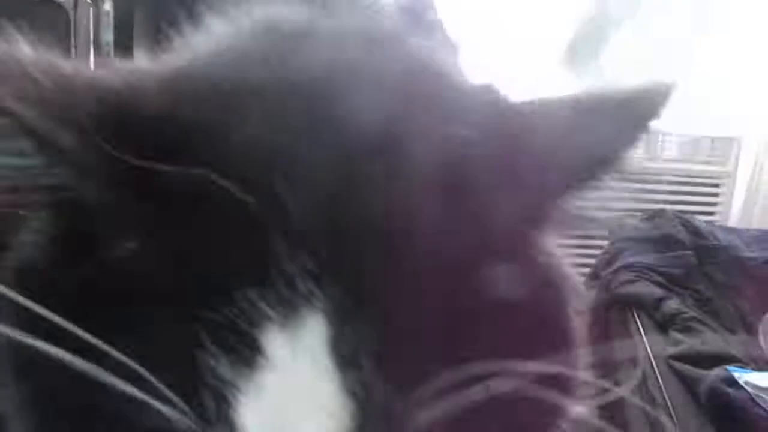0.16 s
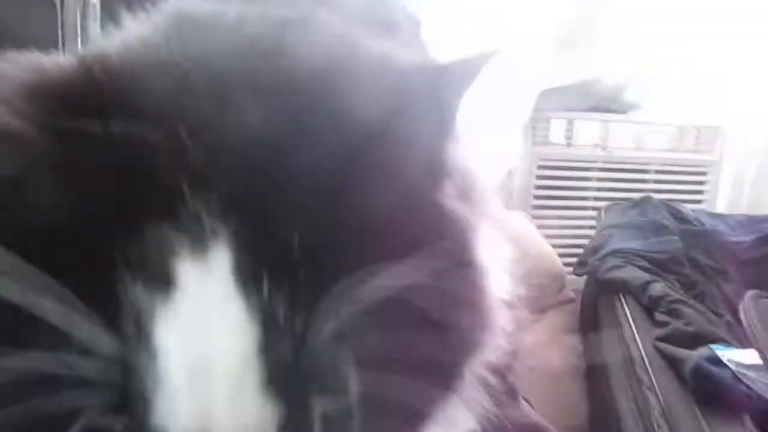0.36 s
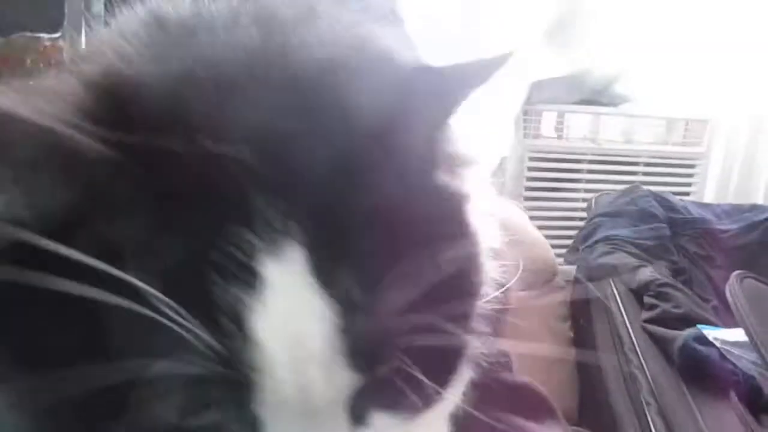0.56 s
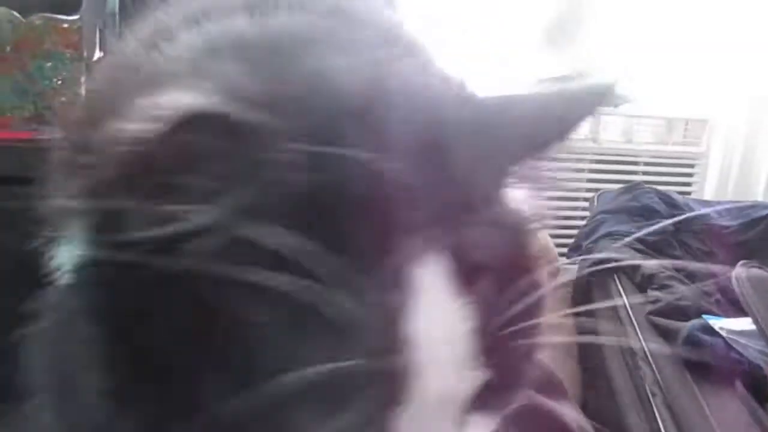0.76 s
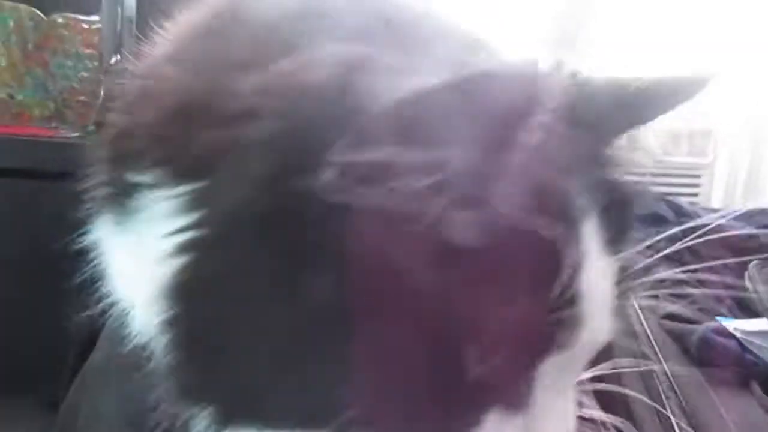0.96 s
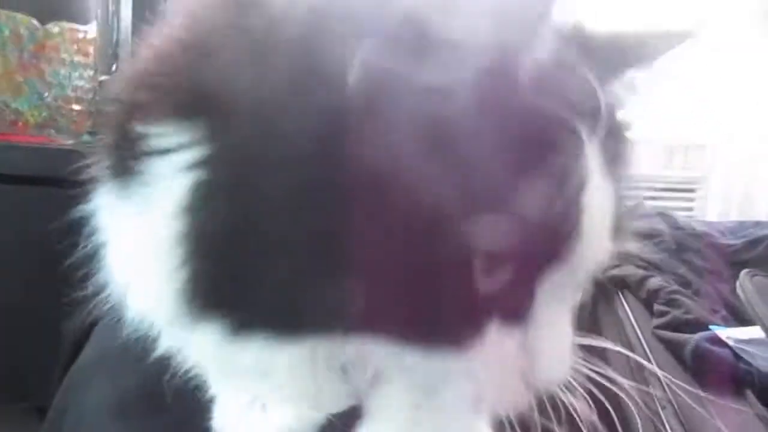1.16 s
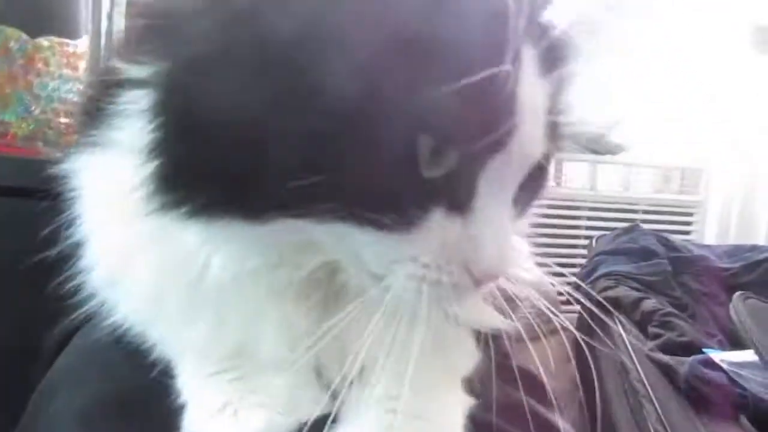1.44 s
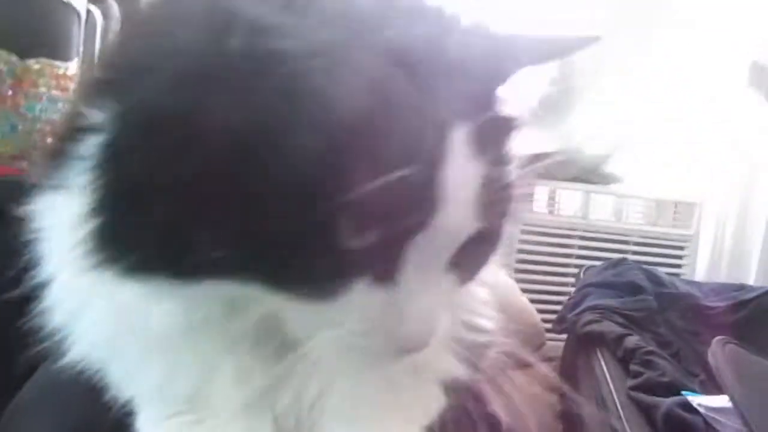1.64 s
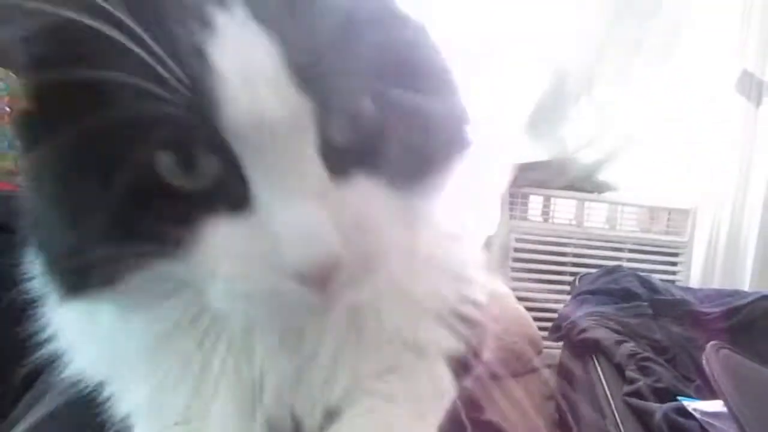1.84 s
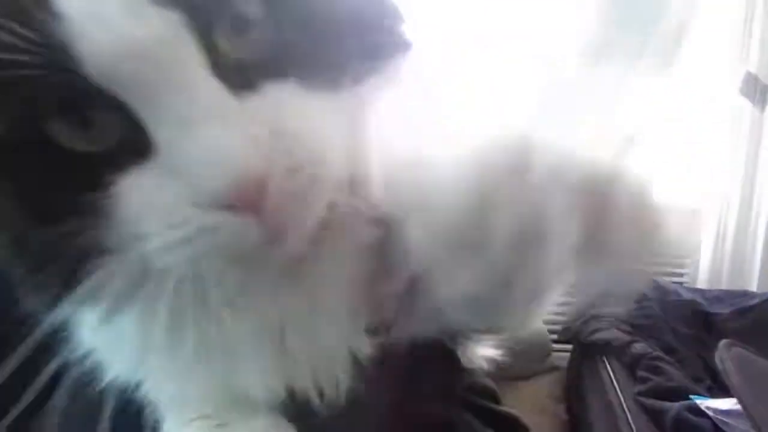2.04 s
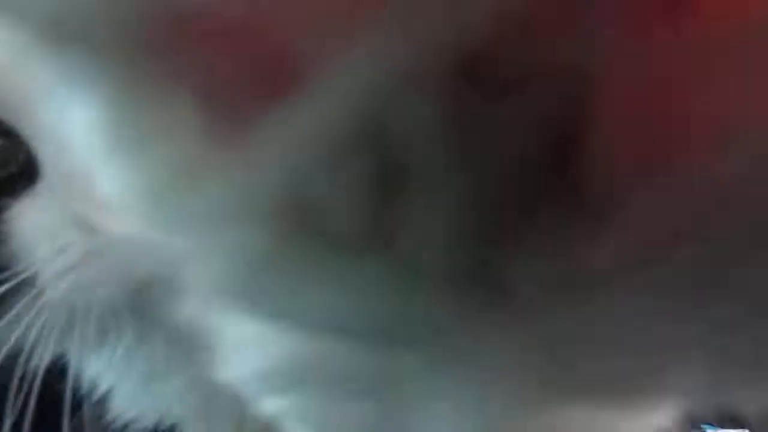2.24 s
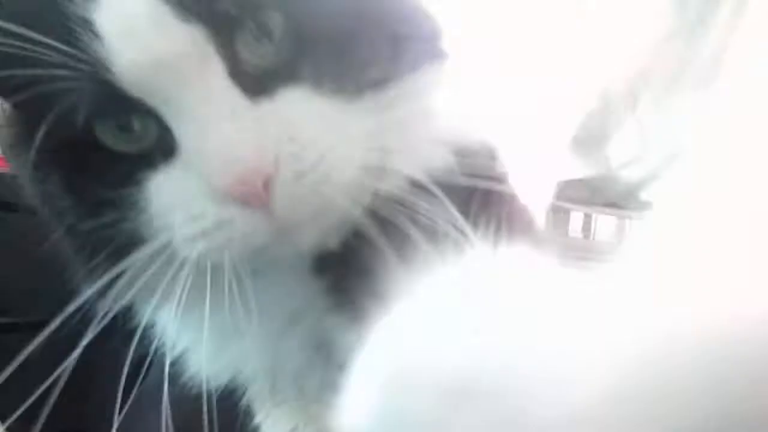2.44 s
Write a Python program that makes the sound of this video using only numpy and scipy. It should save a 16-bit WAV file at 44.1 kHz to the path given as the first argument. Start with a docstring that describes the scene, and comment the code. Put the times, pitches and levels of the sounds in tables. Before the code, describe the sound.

A cat bumps a microphone indoors: clustered dull pops and rubs first, a quieter gap with faint regular ticking, then more thumps and a flickering paw swipe; low room rumble and fuzzy hum stay underneath.

```python
"""Over a quiet room's rumble, fuzzy hum and thin whine, a cat bumps and rubs its face on a camera from 0.2 s.
The harder pushes overload the microphone, whose bass cut turns the flattened swings into dull pops; the softer
ones stay below its limit. Whiskers and claws tick on the case throughout: short noise snaps with a ring.
From 0.9 s a faint gliding tone calls, probably a mew; from 1.4 to 2.1 s tiny falling chirps and soft thuds
tick regularly. At 2.3 s a paw brushes past as flickering, resonant noise, between the last bumps and rubs."""
import sys
import numpy as np
from scipy import signal
from scipy.fft import rfft, irfft
from scipy.io import wavfile

SR = 44100
rng = np.random.default_rng(int(sys.argv[2]) if len(sys.argv) > 2 else 0)


def wrap_up_sound(samples):
    """Save the sound to the file named by the first command line argument, as 16-bit audio."""
    columns = np.atleast_2d(samples).T
    # keep every value between -1 and 1, then stretch to whole-number steps
    tamed = np.clip(columns, -1, 1)
    steps = np.round(tamed * 32767).astype(np.int16)
    wavfile.write(sys.argv[1], SR, steps)


N = 114660  # 2.6 s

# Nose and paw bumps: (time [s], width [ms], peak pressure [dB over the overload point])
BUMPS = [(0.2077, 4.4, -6), (0.2316, 2.72, 1), (0.2483, 2.23, 6.5), (0.2571, 1.07, 9), (.4818, 3.85, 0.5),
         (0.6093, 2.96, 5.5), (0.6505, 2.325, 14), (0.6786, 3.05, -4.5), (.313, 8.9, -13),
         (0.706, 2.95, -20), (0.776, 4.0, -27.5), (0.8489, 3.97, 5), (1.1622, 2.264, 14.5),
         (1.709, 4.16, -28), (1.93, 2.6, 5.5), (1.939, 2.13, 9), (2.161, 2.52, 8), (2.2962, 2.86, 9),
         (2.418, 7.8, -6.5)]
# Rubs of the face: (start [s], length [s], start pressure [dB over the overload point], end pressure [dB],
# mean judder rate [Hz], grit [dB against judder], sway [dB against judder])
RUBS = [(0.232, 0.019, -9, -6, 170, -1.5, -6.5), (0.244, 0.026, 7.5, 4, 91, -10, -4),
        (0.259, 0.052, -7.5, -10, 150, -6.5, -15.5), (0.6, 0.043, 0.5, -1.5, 55.9, -18, -9),
        (.635, 0.028, 0.5, 5.5, 153.5, -13.5, -4), (0.844, 0.074, 15.5, -0.5, 111.7, -8, -5.5),
        (1.131, 0.043, -13, 4, 85.07, -8.5, -18), (1.158, 0.056, 4, -27, 96.2, -10, -2),
        (1.902, .048, -4, 2.5, 129.5, -6.5, -1), (1.941, 0.0398, -13, -33, 125.5, -3.5, 1),
        (2.151, 0.03, 4, -3, 71.2, -10.5, -8), (2.172, 0.041, -19.5, -30.5, 102, -6.5, 11),
        (2.282, 0.0275, 8, 4.5, 110, -15.5, -12), (2.407, 0.027, -18, -18, 142, -20.5, -28.5)]
# Whisker and claw ticks: (time [s], snap level [dB], ring pitch [Hz], ring share [dB against snap])
TICKS = [(0.1951, -35.5, 2100, -21.5), (.473, -47, 3760, -9.5), (.509, -43.5, 3940, -35.5),
         (1.1293, -34, 3900, -18.5), (1.7018, -38, 3630, -16.5), (2.070, -51.5, 2500, -11),
         (2.2485, -27, 3240, -11), (2.2578, -28, 4800, -14), (2.2685, -26.5, 3520, -8.5),
         (2.329, -35.5, 3910, 9), (2.592, -45.5, 3530, -10)]
# Colour of a tick's snap: (frequency [Hz], relative level [dB per Hz])
TICK_COLOUR = [(60, -7.5), (400, 14.5), (1200, -0.5), (3000, -10), (5500, -22), (11000, -36), (15000, -61)]
# Colour of the fur's grit in the rubs: (frequency [Hz], relative level [dB per Hz])
GRIT_COLOUR = [(30, -5), (150, 10.5), (350, 4.5), (700, -13.5), (1400, -29.5), (3000, -47.5), (8000, -57),
               (16000, -74)]
# Resonant colour of the paw's brush: (frequency [Hz], relative level [dB per Hz])
BRUSH_COLOUR = [(200, 17), (700, 5.5), (1400, -13), (1950, 1), (2500, -21.5), (3400, 2), (3950, 0.5),
                (4700, -0.5), (5600, -19.5), (7400, -15), (8500, -3), (9400, -14), (12500, -26.5),
                (16000, -56.5)]
# Glide of the mew: (time [s], pitch [Hz], level of the fundamental [dB], overtones [dB against it])
MEW = [(.92, 350, -34, -12), (.97, 344.6, -55.5, 5), (1.01, 405, -53.5, 2.5), (1.05, 485, -50.5, -1.5),
       (1.10, 535, -58, -1.5), (1.18, 512.8, -42, -17), (1.24, 513, -51.5, -13.5), (1.29, 492, -48, -14.5),
       (1.345, 463, -52.5, -17), (1.38, 455, -64, -26)]
# Colour of the room's rumble: (frequency [Hz], relative level [dB per Hz])
ROOM_COLOUR = [(25, -2.5), (50, 4), (90, -10), (170, -17.5), (350, -15), (480, -25), (650, -29.5),
               (800, -36), (1200, -27), (1600, -40), (2500, -47.5), (5000, -52.5), (9000, -61),
               (16000, -63.5)]
# Swell of the rumble: (time [s], level [dB])
ROOM_LEVEL = [(0, -47.5), (.4, -45), (.8, -44.5), (1.1, -45), (1.45, -53.5), (1.8, -49.5), (2.05, -46),
              (2.6, -53)]
# Resonances of the hum: (frequency [Hz], width [Hz], level before the swell [dB])
HUM_BANDS = [(297, 14, -69), (377, 23, -66), (640, 240, -70), (1207, 110, -77.5)]
# Swell of the hum: (time [s], gain [dB])
HUM_GAIN = [(0, 5.5), (.2, 10), (.45, 6.5), (.8, 8.5), (1.45, 1.5), (2.6, -3.5)]
# Thin whine: (frequency [Hz], level [dB])
WHINE = [(11822, -106)]

BUMP_SKEW = 0.4  # the release is slower than the push
RUB_EDGE_S = 0.0086
JUDDER_SPREAD, JUDDER_WANDER_HZ = 0.254, 185  # unevenness of the pace (log units), and how fast it wanders
SWAY_HZ, SWAY_SPREAD, SWAY_WANDER_HZ = 54.03, .15, 37.5
OVERLOAD_KNEE = 49  # higher is a harder corner
BASS_CUT_HZ, TREBLE_CUT_HZ, CONTACT_DB = 148.7, 6800, 1.5
TICK_DECAY_S, TICK_RING_WIDTH_HZ = 0.0025, 700
BRUSH_START_S, BRUSH_LENGTH_S, BRUSH_EDGE_S, BRUSH_DB = 2.3, .13, .028, -40.5
BRUSH_FLICKER_DB, BRUSH_FLICKER_HZ = 2.8, 120
MEW_ROLLOFF_DB = -10  # step from each overtone to the next
TICKING_FIRST_S, TICKING_END_S, TICKING_PERIOD_S, TICKING_PAIR_S = 1.3615, 2.15, .08, .0245
CHIRP_DB, CHIRP_TOP_HZ, CHIRP_END_HZ, CHIRP_LENGTH_S = -64, 3900, 1700, .007  # level varies around this
THUD_DB, THUD_HZ, THUD_LENGTH_S = -48, 345, .028  # level and pitch vary around these
DUCK_FROM_DB, DUCK_SHARE, DUCK_SMOOTH_S = -19.5, 0.53, 0.038
HELD_FALL_DB_PER_S = 10.5  # fall of the held level that steers the ducking
TOP_EDGE_HZ = 16470


def amp(db):
    """Decibels to amplitude."""
    return 10 ** (np.asarray(db) / 20)


def evened(x):
    """The sound at unit power."""
    return x / np.sqrt(np.mean(x ** 2) + 1e-20)


def add(mix, start, sound):
    """Lay a sound into the mix at a time in seconds."""
    part = mix[max(round(start * SR), 0):][:len(sound)]
    part += sound[:len(part)]


def curve(points, axis=1):
    """One column of a control table, joined by straight lines in time."""
    columns = np.transpose(points)
    return np.interp(np.arange(N) / SR, columns[0], columns[axis])


def noise(gain):
    """Noise of unit power with the given gain over frequency."""
    spectrum = rfft(rng.standard_normal(N))
    return evened(irfft(spectrum * gain(np.fft.rfftfreq(N, 1 / SR)), N))


def coloured(points):
    """Unit-power noise that follows a colour table, with the lowest bass eased away."""
    hz, db = np.transpose(points)
    return noise(lambda f: amp(np.interp(np.log(f + 1), np.log(hz), db)) * f / (f + 10))


def band(hz, width):
    """Unit-power noise in one resonance."""
    return noise(lambda f: 1 / (1 + ((f - hz) / width * 2) ** 2))


def stroke(start, length, edge):
    """A window with smooth edges, and the progress through it from 0 to 1."""
    t = np.arange(N) / SR - start
    ramp = np.clip(np.minimum(t, length - t) / edge, 0, 1)
    return np.sin(np.pi / 2 * ramp) ** 2, np.clip(t / length, 0, 1)


def uneven_clock(spread, wander_hz):
    """Phase of a 1 Hz cycle whose pace wanders."""
    pace = np.exp(spread * noise(lambda f: np.exp(-(f / wander_hz) ** 2)))
    return 2 * np.pi * np.cumsum(pace / pace.mean()) / SR


def bumps():
    """Each bump squeezes the air in the microphone port and lets it go more slowly."""
    t, out = np.arange(N) / SR, np.zeros(N)
    for time, width_ms, db in BUMPS:
        u = (t - time) * 1000 / width_ms
        z = np.log(np.maximum(1 + BUMP_SKEW * u, 1e-9)) / BUMP_SKEW  # stretches the second half
        out += amp(db) * z * np.exp(.5 - .5 * z ** 2)
    return out


def rubs():
    """Skin judders unevenly over the port from rest; the head sways more slowly, and the fur adds grit."""
    fast = uneven_clock(JUDDER_SPREAD, JUDDER_WANDER_HZ)
    slow = uneven_clock(SWAY_SPREAD, SWAY_WANDER_HZ)
    grit, out = coloured(GRIT_COLOUR), np.zeros(N)
    for start, length, from_db, to_db, judder_hz, grit_db, sway_db in RUBS:
        window, progress = stroke(start, length, RUB_EDGE_S)
        at = round(start * SR)
        judder = np.sin(judder_hz * (fast - fast[at]))
        sway = np.sin(SWAY_HZ * (slow - slow[at]))
        motion = judder + amp(grit_db) * grit + amp(sway_db) * sway
        out -= window * amp(from_db + (to_db - from_db) * progress) * motion
    return out


def overloaded(pressure):
    """The microphone flattens only the large swings; its bass cut lets each flat top sag to zero."""
    flat = pressure / (1 + abs(pressure) ** OVERLOAD_KNEE) ** (1 / OVERLOAD_KNEE)
    sagged = signal.lfilter(*signal.butter(1, BASS_CUT_HZ, "high", fs=SR), flat)
    dulled = signal.lfilter(*signal.butter(1, TREBLE_CUT_HZ, fs=SR), sagged)
    return amp(CONTACT_DB) * dulled


def whiskers():
    """Whiskers and claws snap on the case: decaying noise, each tick with a brief ring."""
    t, snap, out = np.arange(N) / SR, coloured(TICK_COLOUR), np.zeros(N)
    for time, db, ring_hz, ring_db in TICKS:
        decay = (t >= time) * np.exp(-abs(t - time) / TICK_DECAY_S)
        ring = amp(ring_db) * band(ring_hz, TICK_RING_WIDTH_HZ)
        out += amp(db) * decay * (snap + ring)
    return out


def paw():
    """Fur slides unevenly over the port and hisses in its resonances."""
    flicker = amp(BRUSH_FLICKER_DB * noise(lambda f: np.exp(-f / BRUSH_FLICKER_HZ)))
    window, _ = stroke(BRUSH_START_S, BRUSH_LENGTH_S, BRUSH_EDGE_S)
    return amp(BRUSH_DB) * window * flicker * coloured(BRUSH_COLOUR)


def mew():
    """A faint call: a gliding, slightly quivering sine with three overtones."""
    pitch = curve(MEW) * (1 + 0.0047 * band(46, 40))
    phase = 2 * np.pi * np.cumsum(pitch) / SR
    overtones = sum(amp(MEW_ROLLOFF_DB * k) * np.sin((k + 2) * phase) for k in range(3))
    window, _ = stroke(MEW[0][0], MEW[-1][0] - MEW[0][0], .01)
    return window * amp(curve(MEW, axis=2)) * (np.sin(phase) + amp(curve(MEW, axis=3)) * overtones)


def ticking():
    """Tiny falling chirps come in regular pairs of uneven strength, each pair with a soft thud."""
    u, out = np.arange(0, 1, 1 / (CHIRP_LENGTH_S * SR)), np.zeros(N)
    glide_hz = CHIRP_TOP_HZ * (CHIRP_END_HZ / CHIRP_TOP_HZ) ** u
    chirp = np.sin(np.pi * u) * np.sin(2 * np.pi * np.cumsum(glide_hz) / SR)
    t = np.arange(0, THUD_LENGTH_S, 1 / SR)
    swell = np.sin(np.pi * t / THUD_LENGTH_S) ** 2
    for time in np.arange(TICKING_FIRST_S, TICKING_END_S, TICKING_PERIOD_S):
        first, second, weight, tune = rng.standard_normal(4)
        thud = swell * np.sin(2 * np.pi * THUD_HZ * (1 + 0.035 * tune) * t)
        add(out, time, amp(CHIRP_DB + 2 * first) * chirp)
        add(out, time + TICKING_PAIR_S, amp(CHIRP_DB + 2 * second) * chirp)
        add(out, time, amp(THUD_DB + 2 * weight) * thud)
    return out


def room():
    """Low rumble as coloured noise, a fuzzy hum of narrow noise bands and a thin sine whine."""
    t = np.arange(N) / SR
    rumble = amp(curve(ROOM_LEVEL)) * coloured(ROOM_COLOUR)
    hum = amp(curve(HUM_GAIN)) * sum(amp(db) * band(hz, width) for hz, width, db in HUM_BANDS)
    whine = sum(amp(db) * evened(np.sin(2 * np.pi * hz * t)) for hz, db in WHINE)
    return rumble + hum + whine


def scene():
    """Contact on the microphone over the quiet room."""
    contact = overloaded(bumps() + rubs())
    return (contact + whiskers() + paw() + mew() + ticking() + room())[None]


def record(dry):
    """Gain control ducks after the thumps and slowly recovers; peaks clip, then the top is band-limited."""
    r = np.exp(-1 / (DUCK_SMOOTH_S * SR))
    power = signal.lfilter([1 - r], [1, -r], dry[0] ** 2)
    power_db = 10 * np.log10(power + 1e-12)
    fall = np.arange(N) * HELD_FALL_DB_PER_S / SR
    held_db = np.maximum.accumulate(power_db + fall) - fall  # rises with the power, sinks steadily
    over_db = np.maximum(held_db - DUCK_FROM_DB, 0)
    clipped = np.clip(dry * amp(-DUCK_SHARE * over_db), -1, 1)
    low_pass = signal.firwin(511, TOP_EDGE_HZ, window=("kaiser", 9), fs=SR)
    return signal.oaconvolve(clipped, low_pass[None], "same")


dry = scene()
out = record(dry)
wrap_up_sound(out)
```